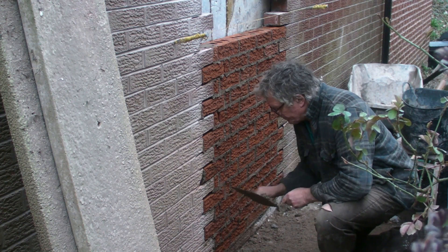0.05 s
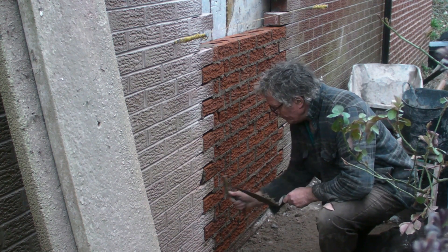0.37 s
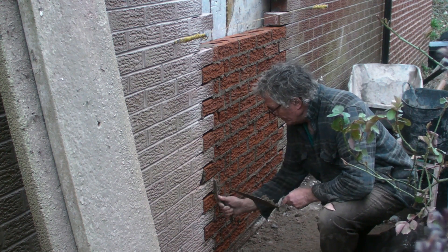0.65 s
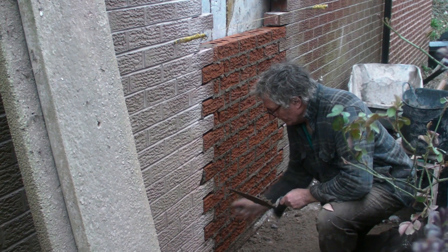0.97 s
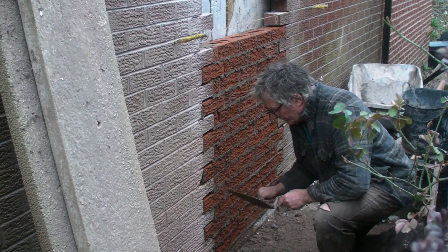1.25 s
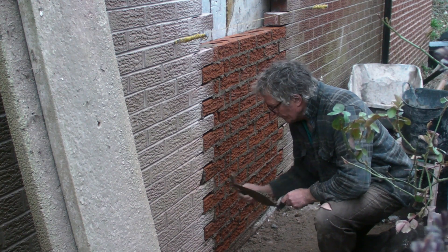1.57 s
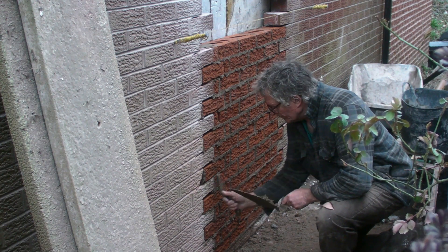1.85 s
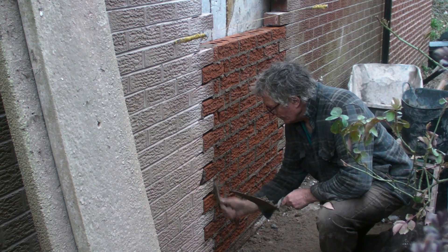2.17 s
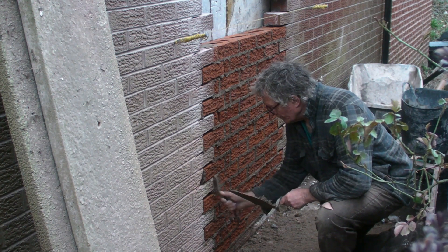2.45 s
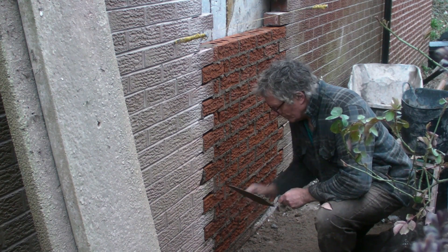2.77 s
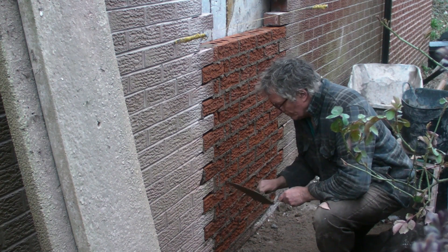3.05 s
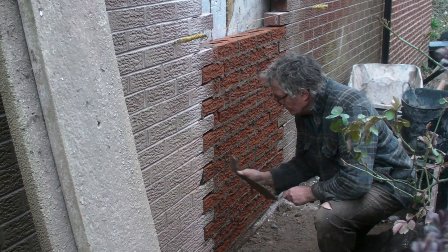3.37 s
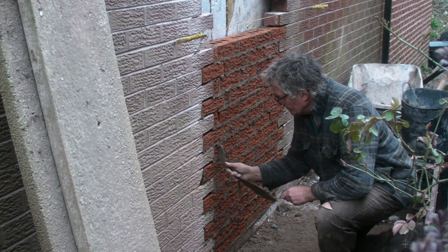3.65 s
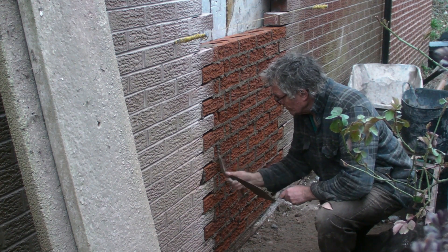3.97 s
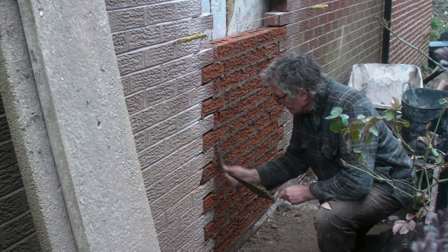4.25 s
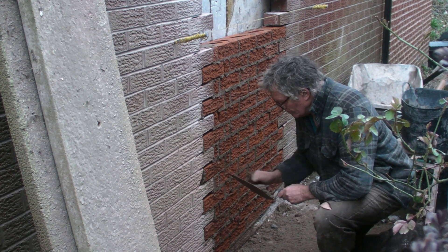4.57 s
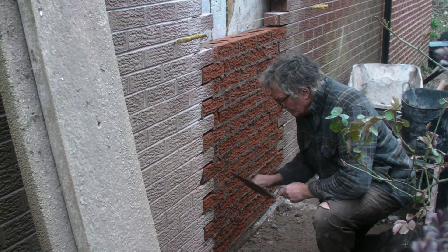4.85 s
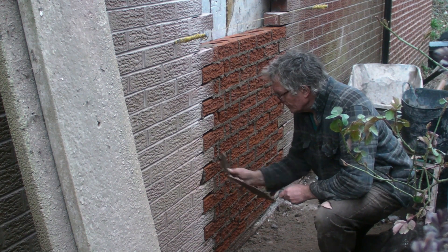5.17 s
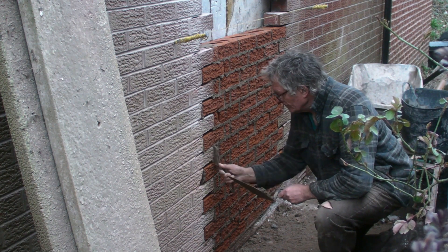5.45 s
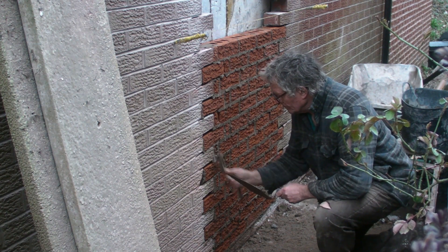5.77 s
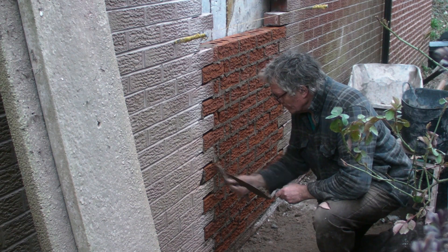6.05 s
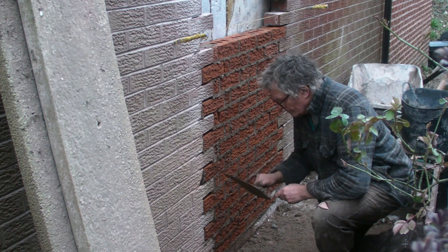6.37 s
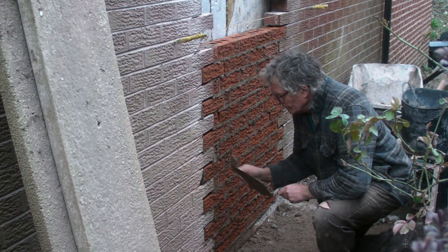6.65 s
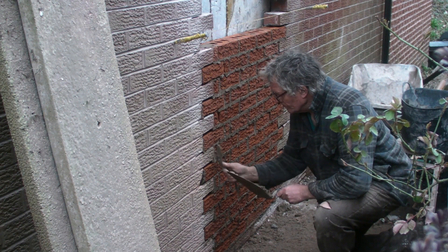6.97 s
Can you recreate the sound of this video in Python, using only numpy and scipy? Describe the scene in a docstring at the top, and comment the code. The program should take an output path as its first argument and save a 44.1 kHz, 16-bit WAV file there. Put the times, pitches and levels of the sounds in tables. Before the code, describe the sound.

A steel tool scrapes gritty wet mortar off a trowel and rubs along brick joints, over wind rumble and distant traffic.

```python
"""A bricklayer points a wall in a narrow yard. From the start a town murmurs and wind hits the microphone.
At 0.1 s a steel jointing iron scrapes wet mortar off a trowel: sand crackles, the blade rings.
Cloth rustles, then the iron knocks on brick and rubs along a joint; near walls echo.
Scrapes follow at 1.4, 3.2 and 4.9 s, each with two or three passes along the joint after it.
The wind drops by 5 s; a last scrape comes at 6.5 s."""
import sys
import numpy as np
from scipy import signal
from scipy.fft import rfft, irfft
from scipy.io import wavfile

SR = 44100
rng = np.random.default_rng(int(sys.argv[2]) if len(sys.argv) > 2 else 0)


def dump_mix(stems):
    """Bounce the given channels to the path in sys.argv[1] as a 16-bit WAV at rate SR."""
    frames = np.atleast_2d(stems).T  # one column per channel
    limited = np.clip(frames, -1, 1)  # hard clip at full scale
    pcm = np.round(limited * 32767).astype(np.int16)
    wavfile.write(sys.argv[1], SR, pcm)


N = 313110
T = np.arange(N) / SR
FREQS = np.maximum(np.arange(N // 2 + 1) * SR / N, 1)

# Broad spectra. Each row: frequency in Hz, relative density in dB.
TRAFFIC_SPECTRUM = [(25, -9.5), (65, 2.5), (115, -11), (240, -8.5), (350, -14.5), (900, -14.5), (1200, -19),
                    (1800, -27), (3000, -35.5), (6500, -39), (9000, -36), (12000, -48), (15500, -47.5)]
WIND_SPECTRUM = [(20, -23.5), (40, 0), (70, 2), (125, 1.5), (200, -7.5), (300, -13.5), (450, -26),
                 (800, -40), (2000, -68)]
EDDY_FRONT_SPECTRUM = [(110, -10), (200, 9.5), (350, -4.5), (560, -8)]
SWELL_SPECTRUM = [(300, -3), (1200, 1), (3000, -4), (6000, -3), (9000, 0), (11500, -9), (15000, -18)]
IRON_SPECTRUM = [(250, 1), (600, -6.5), (1000, 0), (1800, -3.5), (3300, -3), (4700, -2), (6800, -4.5),
                 (8600, 1.5), (10600, -5), (11400, -10.5), (12200, -16), (15000, -22)]
TROWEL_SPECTRUM = [(200, -29.5), (450, -12), (700, -12), (1000, -8), (1800, -10), (3300, -9.5), (4500, -3),
                   (6500, 3.5), (8500, 8), (10000, 8.5), (11500, -0.5), (13000, -4.5), (15000, -11.5)]
# Stereo side response. Each row: frequency in Hz, gain in dB.
SIDE_RESPONSE = [(25, -3), (120, -30), (300, -13.5), (800, -6), (2000, 0.5), (6000, 1), (14000, 1)]
# Distant engine; light air between gusts. Each row: time in seconds, relative level in dB.
ENGINE_LEVELS = [(0, -49), (0.6, -40), (1.2, -39), (2.7, -38), (4.4, -34), (4.85, -33.5), (5.1, -39),
                 (5.25, -51), (5.75, -44), (7.1, -45)]
BREEZE_LEVELS = [(0, -33), (1.2, -34), (2.1, -34), (2.7, -34), (3.5, -34), (4.5, -33), (5.1, -51),
                 (7.1, -45.5)]
# Gusts. Each row: centre in seconds, half length in seconds, relative level in dB, left minus right in dB.
WIND_GUSTS = [(0.111, 0.019, -22.5, 4), (0.335, 0.058, -17.5, -28), (0.504, 0.035, -27, -12),
              (0.569, 0.019, -20, -18), (0.896, 0.06, -28, -3), (1.023, 0.016, -13, -13),
              (1.304, 0.1, -29, 1), (1.562, 0.063, -16, 26), (1.695, 0.055, -11, 10),
              (1.824, 0.04, -11, -11), (1.978, 0.073, -13.5, 18), (2.106, 0.12, -18, 25),
              (2.331, 0.033, -13.5, -11), (2.585, 0.057, -20.5, 25), (2.949, 0.056, -12.5, 10),
              (3.162, .095, -12.5, -2), (3.417, 0.076, -12.5, -22), (3.514, 0.082, -16, 9),
              (3.597, 0.11, -14.5, -16), (3.841, 0.076, -20, 18), (4.0, 0.095, -21, 26),
              (4.183, 0.042, -27, 4), (4.317, 0.058, -21.5, 4.5)]
# Eddies in the gusts. Each row: start in seconds, relative level in dB, frequency in Hz,
# relative level of the front in dB.
WIND_EDDIES = [(0.328, -15, 92, -15), (0.573, -26, 157, -12.5), (1.02, -32, 110, -15),
               (1.688, -30, 139, -9), (1.713, -18, 81.5, -12), (1.809, -6, 140, -12), (1.965, -6, 98, -11),
               (2.077, -15, 190, -6), (2.575, -11, 70, -27), (2.947, -1.5, 102, -18), (3.128, -5, 133, -15),
               (3.151, -7, 80, -11), (3.574, -13, 99, -13.5)]
# Soft swells of hiss: brief ones leading into the scrapes, the others cloth rustling.
# Each row: centre in seconds, half length in seconds, relative level in dB.
HISS_SWELLS = [(0.095, .035, -42), (0.43, .2, -52), (1.33, .08, -55), (1.425, .025, -45), (3.17, .025, -41),
               (4.58, .05, -47), (4.67, .1, -46.5), (4.83, .06, -50), (5.30, .13, -49), (6.45, .04, -51),
               (7.05, .04, -50)]
# Steel resonances. Each row: frequency in Hz, width in Hz, level over the broad spectrum in dB.
IRON_RESONANCES = [(1310, 100, 9.5), (2380, 70, 11.5), (2500, 70, 9), (2830, 120, 2), (3880, 150, 6),
                   (5500, 90, 12), (5750, 200, 4), (8000, 220, 5), (8930, 160, 3), (9880, 220, 5),
                   (11380, 300, 6)]
TROWEL_RESONANCES = [(2350, 200, 2), (2900, 150, -3), (6400, 300, -6), (7850, 300, -5), (9080, 400, -3)]
# Iron hits brick or stone. Each row: start in seconds, relative level in dB, body over hiss in dB.
IRON_KNOCKS = [(0.627, -34, 2.5), (0.753, -21, -6), (0.877, -17, -7.5), (2.4915, -10.5, -8),
               (2.582, -16, -5), (3.907, -24, -8), (4.338, -14, -18), (5.536, -31, -3), (5.576, -29, 9.5),
               (5.631, -21.5, 3), (5.69, -29, -4), (5.938, -40.5, 22)]
# Iron runs along a joint. Each row: fastest moment, rise and fall in seconds, relative level in dB,
# body over hiss in dB.
IRON_PASSES = [(0.861, 0.17, 0.1, -26.5, -2.5), (2.249, 0.092, 0.074, -19.5, -3),
               (2.515, 0.024, 0.056, -29.5, -4), (2.607, 0.058, 0.074, -20, -2.5),
               (3.876, 0.032, 0.032, -29.5, -4), (3.953, 0.084, 0.081, -21, -3),
               (4.349, 0.076, 0.079, -23.5, -3.5), (5.62, 0.095, 0.068, -27.5, 0.5),
               (5.698, 0.015, 0.048, -33.5, 3), (6.037, 0.075, 0.057, -23, -0.5)]
# Iron crosses the trowel. Each row: start, landing time, age at easing and age at lift-off in seconds,
# relative level in dB, body over hiss in dB.
TROWEL_STROKES = [(0.097, 0.0055, 0.097, 0.12, -14, -8), (1.429, 0.0031, 0.084, 0.094, -15, -9),
                  (1.558, 0.012, 0.028, 0.034, -22, -12), (3.160, 0.027, 0.14, 0.27, -16.5, -7),
                  (3.47, 0.044, 0.088, 0.094, -42, -17), (4.881, 0.0064, 0.17, 0.14, -15, -9),
                  (6.522, 0.016, .12, .18, -16, -7.5), (6.78, .02, 0.05, .07, -47, -10)]
# Coarse grains crack on the trowel. Each row: start in seconds, relative level in dB.
GRAIN_CRACKS = [(0.146, -10.5), (0.447, -43), (0.502, -44), (1.436, -11), (1.476, -17), (1.727, -39.5),
                (3.217, -27), (3.278, -20), (4.565, -40), (5, -33), (5.018, -13.5), (6.509, -27.5),
                (6.561, -23)]


def undb(db):
    """Decibels to gain."""
    return 10 ** (np.asarray(db) / 20)


def unit(x):
    """Scale to rms 1."""
    return x / np.sqrt(np.mean(x ** 2))


def curve(rows):
    """Rows of (seconds, value), joined by straight lines."""
    return np.interp(T, *np.transpose(rows))


def walk(rate_hz):
    """Smooth random drift, rms 1."""
    return unit(irfft(rfft(rng.standard_normal(N)) / (1 + (FREQS / rate_hz) ** 4), N))


def low_pass(hz):
    """Gain of a steep low-pass."""
    return 1 / np.sqrt(1 + (FREQS / hz) ** 12)


def spectrum(points, modes=()):
    """Gain per frequency: a broad shape with resonances on it."""
    hz, db = np.transpose(points)
    broad = undb(np.interp(np.log(FREQS), np.log(hz), db))
    peaks = sum(undb(over_db) ** 2 / (1 + (2 * (FREQS - mode_hz) / width_hz) ** 2)
                for mode_hz, width_hz, over_db in modes)
    return broad * np.sqrt(1 + peaks) * np.minimum(FREQS / hz[0], 1) ** 2


def ring(x, gain):
    """Minimum-phase filter: resonances ring after each blow."""
    cepstrum = irfft(np.log(gain + 1e-6), N)
    cepstrum[1:N // 2] *= 2
    cepstrum[N // 2 + 1:] = 0
    return irfft(rfft(x) * np.exp(rfft(cepstrum)), N)


def stereo(mid, side):
    """Two close microphone ports: long waves reach both nearly alike."""
    return mid + ring(side, spectrum(SIDE_RESPONSE)) * np.array([[1], [-1]])


def yard(x, wall_db, tail_db, wall_decay_s, t60_s, left_db):
    """Direct sound, brick echoes that change as the hand moves, and a short tail."""
    hop, t = 1536, T[:1024]
    fade = np.sin(np.pi * np.arange(2 * hop) / (2 * hop))
    near = np.zeros((2, N + 4 * hop))
    for start in range(0, N - 2 * hop, hop):
        paths = rng.standard_normal((2, len(t))) * np.exp(-t / wall_decay_s) * np.minimum(t / 0.00032, 1)
        paths /= np.sqrt(np.sum(paths ** 2, axis=1, keepdims=True))
        echo = signal.fftconvolve((x[start:start + 2 * hop] * fade)[None], paths, axes=1)
        near[:, start:start + echo.shape[1]] += echo
    t = T[:SR // 2]
    tail = rng.standard_normal((2, len(t))) * undb(-60 * t / t60_s) * np.minimum(t / 0.0052, 1)
    far = signal.fftconvolve(x[None], tail / np.sqrt(np.sum(tail[0] ** 2)), axes=1)[:, :N]
    mid, side = undb(wall_db) * near[:, :N] + undb(tail_db) * far
    total = np.sqrt(1 + undb(wall_db) ** 2 + undb(tail_db) ** 2)
    return stereo(x + mid, side) / total * undb([[left_db / 2], [-left_db / 2]])


def traffic(level_db=-35.5, flutter_db=0.78):
    """Far traffic murmurs from all around."""
    gain = spectrum(TRAFFIC_SPECTRUM)
    mid, side = (unit(ring(rng.standard_normal(N), gain)) for _ in range(2))
    return stereo(mid, undb(-0.5) * side) * undb(level_db + flutter_db * walk(14))


def engine(firing_hz=77, waver=0.037, flutter_db=0.5):
    """The firing note of an engine some streets away."""
    phase = 2 * np.pi * np.cumsum(firing_hz * (1 + waver * walk(6.1))) / SR
    return np.sqrt(2) * np.sin(phase) * undb(curve(ENGINE_LEVELS) + flutter_db * walk(6))


def airflow():
    """Turbulence strength at the left and right port: gusts over a breeze."""
    power = undb(curve(BREEZE_LEVELS)) ** 2
    for centre_s, half_s, db, left_db in WIND_GUSTS:
        share = undb([[left_db], [-left_db]])
        swell = np.exp(-2 * ((T - centre_s) / half_s) ** 2)
        power = power + share / share.mean() * undb(db) ** 2 * swell
    return np.sqrt(power)


def eddies():
    """Each eddy is a low thump; its front is a sudden push, heard as a dull knock."""
    thumps, fronts = np.zeros((2, N)), np.zeros(N)
    for start_s, db, hz, front_db in WIND_EDDIES:
        turns = np.clip((T - start_s) * hz, 0, 20)
        envelope = undb(db) * 2 * turns * np.exp(-turns / 0.8)
        thumps += envelope * np.sin(2 * np.pi * (turns + rng.random((2, 1))))
        fronts[int(start_s * SR)] = undb(front_db)
    gain = spectrum(EDDY_FRONT_SPECTRUM) * low_pass(580)
    return thumps + ring(fronts, gain / gain.mean())


def wind(flutter_db=2.3):
    """Turbulence rumbles on each port separately; eddies thump on the side of their gust."""
    gain, flow = spectrum(WIND_SPECTRUM), airflow()
    pressures = [rng.standard_normal(N) * undb(flutter_db * walk(35)) for _ in range(2)]
    rumble = np.array([unit(ring(port, gain)) for port in pressures]) * flow * undb(-0.42)
    balance = flow / np.sqrt(np.mean(flow ** 2, axis=0))
    return rumble + eddies() * balance


def friction(grains_per_s, spread_db, smear_db, judder_hz, judder_db):
    """Uneven grain impulses over a smooth smear of noise; the hand judders."""
    sizes = undb(spread_db * np.minimum(rng.exponential(size=N), 4))
    grains = (rng.random(N) < grains_per_s / SR) * sizes * rng.choice([-1, 1], N)
    smear = undb(smear_db) * rng.standard_normal(N)
    return unit((unit(grains) + smear) * undb(judder_db * walk(judder_hz)))


def soft_hiss():
    """Toneless swells: brief ones lead into the scrapes, the others are cloth sliding over cloth."""
    swell = sum(undb(db) * np.exp(-2 * ((T - centre_s) / half_s) ** 2)
                for centre_s, half_s, db in HISS_SWELLS)
    texture = friction(grains_per_s=900, spread_db=2.5, smear_db=0, judder_hz=40, judder_db=2)
    sound = ring(texture * swell, unit(spectrum(SWELL_SPECTRUM)))
    return yard(sound, wall_db=0, tail_db=-10, wall_decay_s=0.005, t60_s=0.17, left_db=0.5)


def crunch(start_s, decay_s):
    """Force of a grain being crushed: a brief noise burst."""
    age_s, burst = T[:2048], np.zeros(N)
    envelope = np.minimum(2 * age_s / decay_s, 1) * np.exp(0.5 - age_s / decay_s)
    first = int(start_s * SR)
    burst[first:first + len(age_s)] = envelope * rng.standard_normal(len(age_s))
    return burst


def steel(hiss_force, body_force, gain, crossover_hz=3400):
    """A tool driven by sharp contacts (hiss, treble) and hand pressure (body, midrange)."""
    low = low_pass(crossover_hz)
    high = np.sqrt(1 - low ** 2)
    return ring(hiss_force, unit(gain * high)) + ring(body_force, unit(gain * low))


def joint_pass(fastest_s, rise_s, fall_s, db, body_db, end_drop_db=19.5, dulling=0.18):
    """Pressure (hiss, body) of one pass: swells and fades with hand speed, duller when slow."""
    away = np.maximum((fastest_s - T) / rise_s, (T - fastest_s) / fall_s)
    drop_db = end_drop_db * np.minimum(away, 10) ** 1.46
    return undb([db - drop_db, db + body_db - (1 - dulling) * drop_db])


def iron():
    """The narrow iron rubs along the joint and knocks on brick, ringing in its own modes."""
    sand = friction(grains_per_s=2000, spread_db=3.5, smear_db=4, judder_hz=60, judder_db=1.82)
    force = sand * sum(joint_pass(*row) for row in IRON_PASSES)
    for start_s, db, body_db in IRON_KNOCKS:
        force += undb([[db], [db + body_db]]) * crunch(start_s, decay_s=0.0043)
    sound = undb(-1.07) * steel(*force, spectrum(IRON_SPECTRUM, IRON_RESONANCES))
    return yard(sound, wall_db=0, tail_db=-8, wall_decay_s=0.005, t60_s=0.17, left_db=1.5)


def blade_stroke(start_s, landing_s, ease_s, lift_s, db, body_db, ease_db_per_s=93, lift_db_per_s=236):
    """Pressure (hiss, body) of one push: lands, holds, eases, lifts off."""
    age_s = np.maximum(T - start_s, 0)
    landing = np.minimum(age_s / landing_s, 1) ** 2
    fall_db = ease_db_per_s * np.maximum(age_s - ease_s, 0) + lift_db_per_s * np.maximum(age_s - lift_s, 0)
    return landing * undb(db - fall_db) * undb([[0], [body_db]])


def blade_bending(force, start_hz, end_hz, glide_s, width_hz):
    """The blade's main bending mode rises as the iron slides along it."""
    starts_s = np.array([row[0] for row in TROWEL_STROKES])
    age_s = T - starts_s[np.maximum(np.searchsorted(starts_s, T) - 1, 0)]
    mode_hz = np.interp(age_s, [0, glide_s], [start_hz, end_hz])
    phasor = np.exp(2j * np.pi * np.cumsum(mode_hz) / SR)
    pole = np.exp(-np.pi * width_hz / SR)
    return 2 * np.real(phasor * signal.lfilter([1 - pole], [1, -pole], force / phasor))


def trowel():
    """Wet mortar is scraped off the broad blade: bright, gritty hiss and cracking grains."""
    sand = friction(grains_per_s=3500, spread_db=4, smear_db=0.5, judder_hz=70, judder_db=1.16)
    hiss, body = sand * sum(blade_stroke(*row) for row in TROWEL_STROKES)
    cracks = sum(undb(db) * crunch(start_s, decay_s=0.0039) for start_s, db in GRAIN_CRACKS)
    body += undb(-6.5) * cracks
    body += blade_bending(body, start_hz=1150, end_hz=1700, glide_s=0.17, width_hz=150)
    gain = spectrum(TROWEL_SPECTRUM, TROWEL_RESONANCES)
    sound = undb(-2.5) * steel(hiss + cracks, undb(1.2) * body, gain)
    return yard(sound, wall_db=-0.5, tail_db=-11.5, wall_decay_s=0.0052, t60_s=0.31, left_db=1.3)


def scene():
    """Both tools, soft hiss, wind and town, in stereo."""
    return trowel() + iron() + soft_hiss() + wind() + traffic() + engine()


def record(dry):
    """Clip at full scale, then cut the top."""
    top_hz = 15400
    return signal.sosfilt(signal.ellip(10, 0.2, 80, top_hz, fs=SR, output="sos"), np.clip(dry, -1, 1))


dry = scene()
out = record(dry)
dump_mix(out)
```